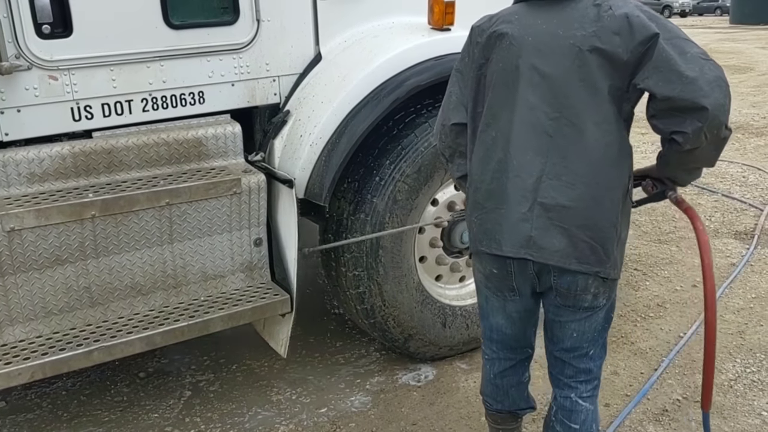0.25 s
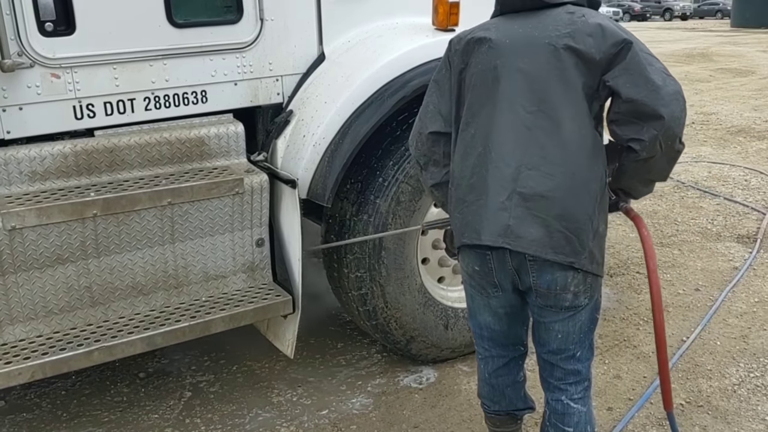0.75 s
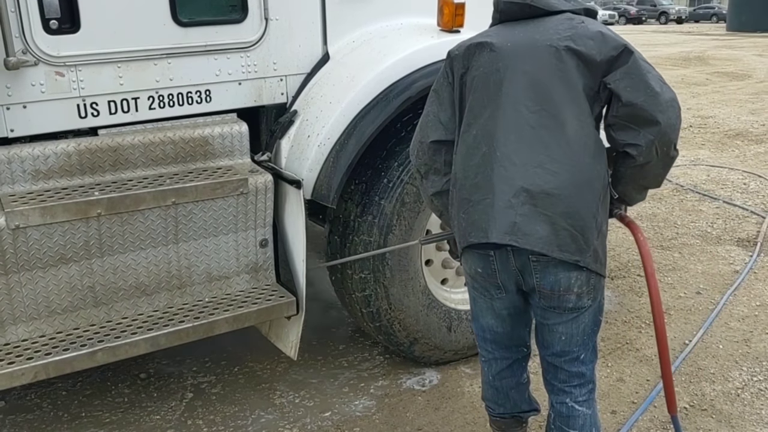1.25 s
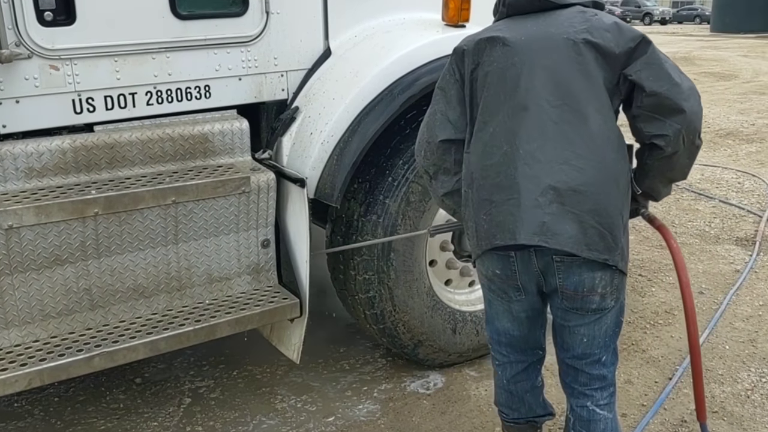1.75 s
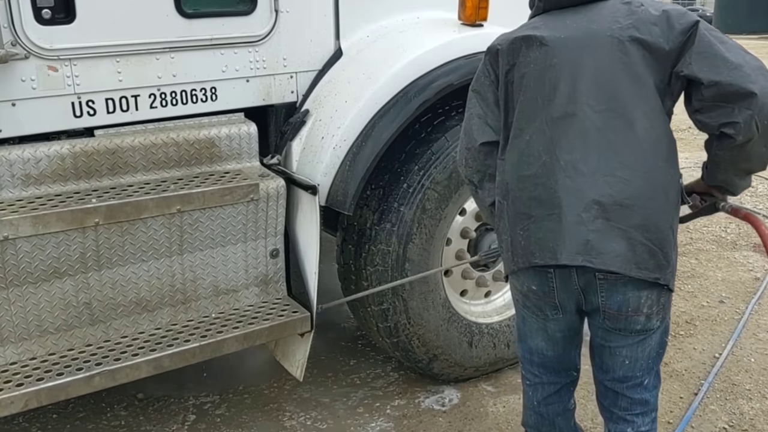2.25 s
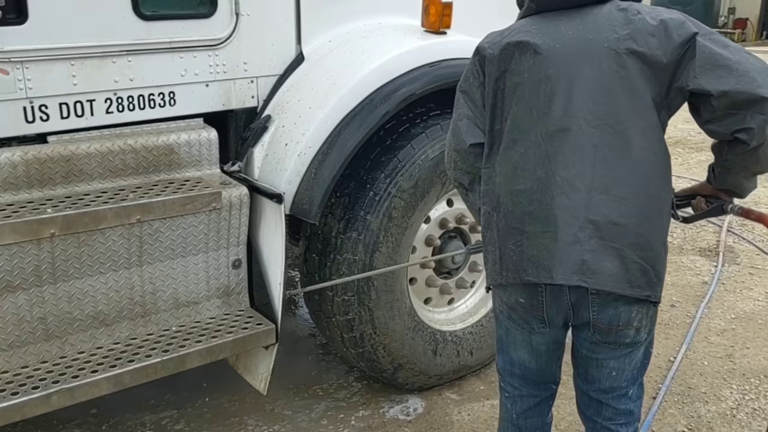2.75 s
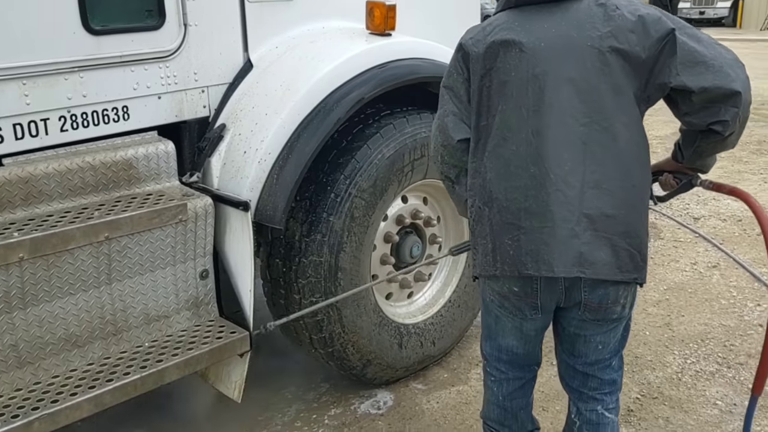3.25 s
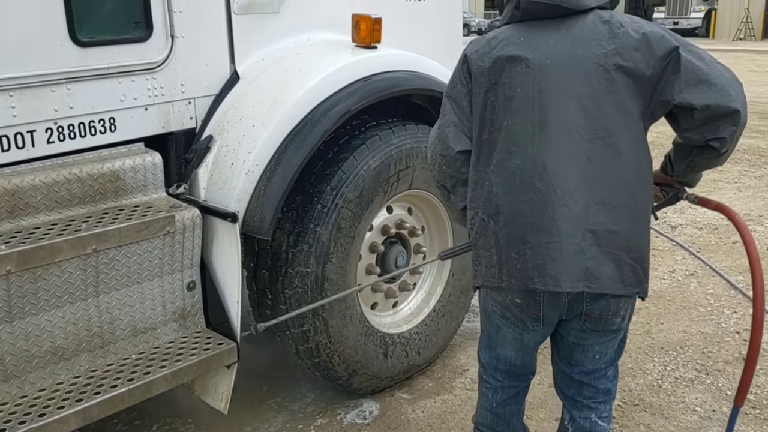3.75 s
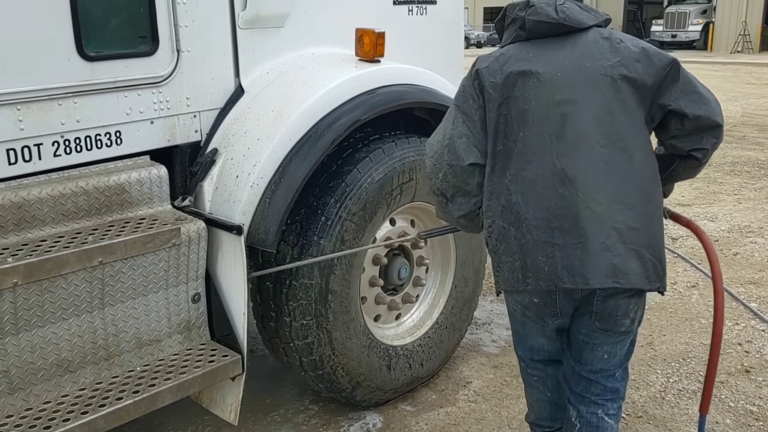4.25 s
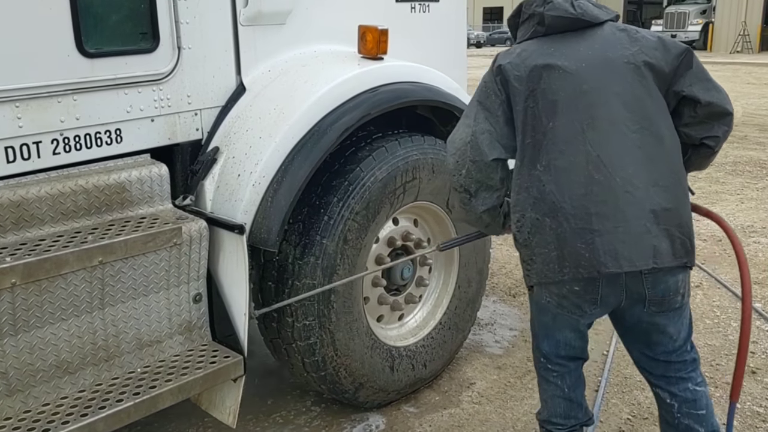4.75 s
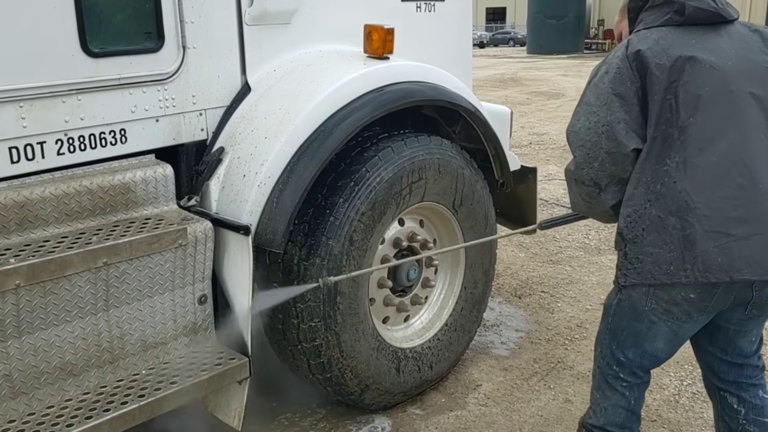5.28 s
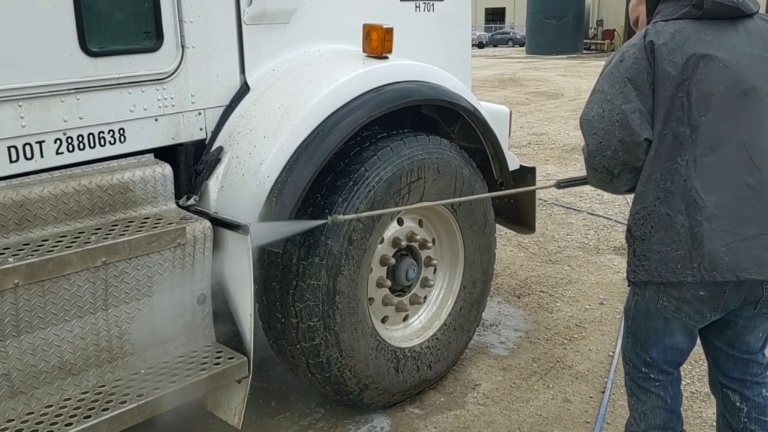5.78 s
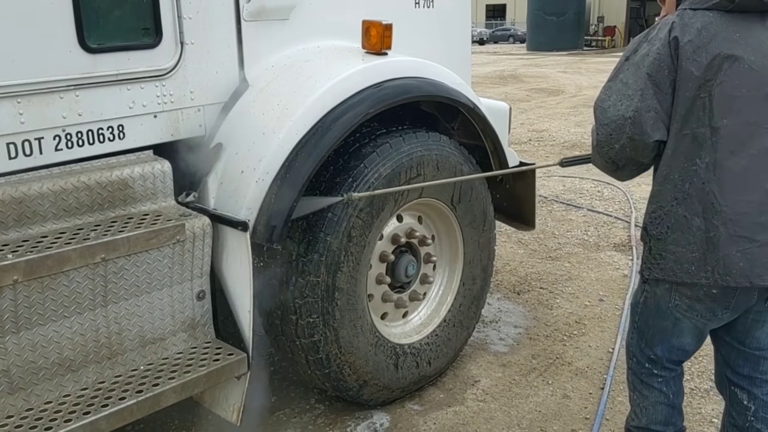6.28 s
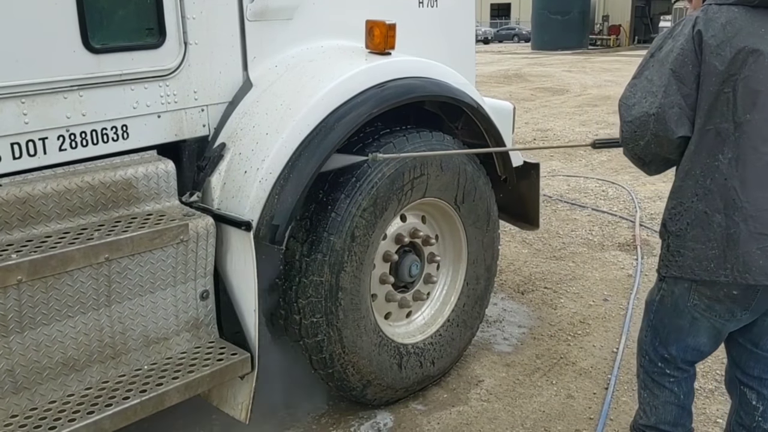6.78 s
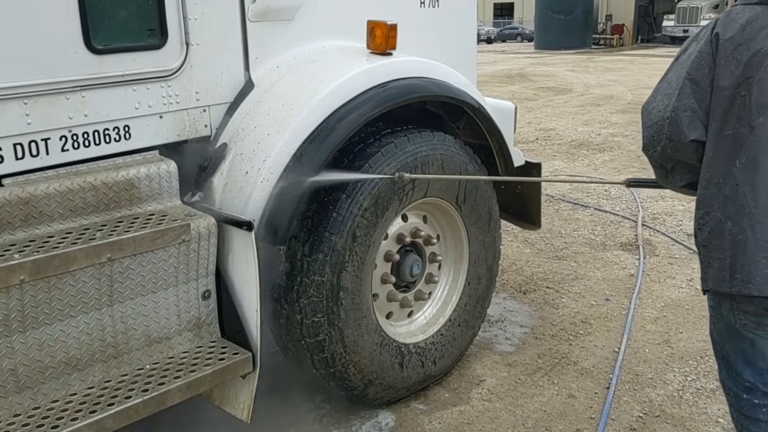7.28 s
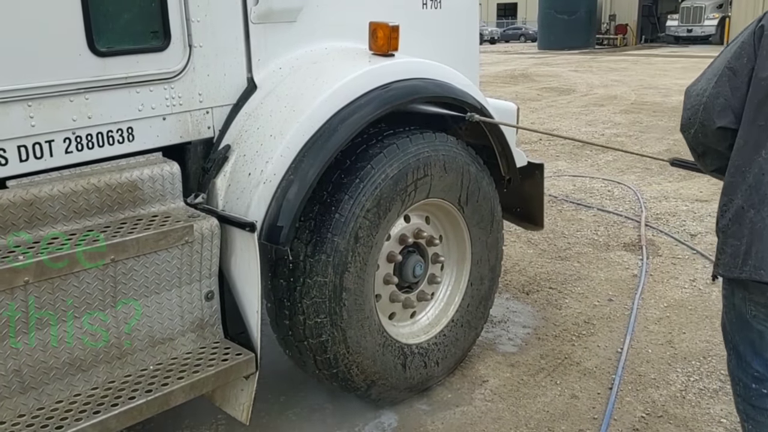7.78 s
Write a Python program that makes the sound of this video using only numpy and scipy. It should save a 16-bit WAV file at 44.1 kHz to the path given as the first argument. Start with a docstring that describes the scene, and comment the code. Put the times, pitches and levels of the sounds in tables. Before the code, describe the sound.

A bright, dense water hiss runs throughout over a distant motor's low throbbing hum. Water bursts on a rubber tyre and brushes the flap in soft hollow swells, with one brief, faint rising squeal early on. The motor recedes; the worker steps aside, the hiss becomes more exposed, and the jet climbs into the wheel arch, pelting the panel ever louder. Open gravel yard, handheld stereo microphone nearby, dry with slight reflections.

```python
"""A water jet hisses and splashes on a truck tyre, catches the mud flap, and at last drums in the wheel arch.
Spray and splash are coloured noise and dense random drops, their pitch following the aim of the wand;
the fender panel is a bank of drifting resonances pelted by drops, and a sweeping sine squeals once.
The pressure washer's engine hums some way off, a sum of orders over a throbbing rumble,
fading as the microphone moves along the truck."""
import sys
import numpy as np
from scipy import signal
from scipy.fft import rfft, irfft
from scipy.io import wavfile
from scipy.ndimage import map_coordinates

SR = 44100
rng = np.random.default_rng(int(sys.argv[2]) if len(sys.argv) > 2 else 0)


def transcribe(signal):
    """Save signal, clipped to [-1, 1], as a 16-bit WAV file at the path in sys.argv[1]."""
    frames = np.atleast_2d(signal).T
    limited = np.clip(frames, -1, 1)
    pcm = np.round(limited * 32767).astype(np.int16)
    wavfile.write(sys.argv[1], SR, pcm)


N = 353682
TIME, FREQ = np.arange(N) / SR, np.arange(N // 2 + 1) * SR / N

# pitch of spray and splash as the wand turns: (time [s], frequency ratio)
AIM_RATIO = [(0, 0.97), (2.4, 0.95), (3.1, 1.14), (4.2, 1.1), (5.25, 1), (8, 0.9)]
# the spray spreads wide: (frequency [Hz], left-right likeness [-1 to 1])
WIDE_LIKENESS = [(1200,-0.062),(1700,0.44),(2600,0.19),(3400,-0.054),(4300,0.25),(5200,0.32),(6500,0.12),(15000,-0.27)]
# jet sweeps across the mud flap: (time [s], splash level [dB], thud level [dB])
FLAP_SWEEPS = [(1.09,-52.5,-50),(1.54,-66,-57),(2.07,-51,-70),(2.377,-51,-50),(2.67,-50,-53.5),(2.99,-50,-64),(3.37,-51.5,-58),(3.78,-55,-60),(4.2,-57.5,-60),(4.8,-58,-63.5),(5.29,-52.5,-63.5),(5.51,-64,-58),(5.721,-62,-53),(5.99,-53.5,-56.5),(6.61,-63,-55),(6.69,-52.5,-62),(6.97,-53,-56),(7.35,-55,-60),(7.805,-70,-54)]
# jet drumming on the fender, before trims: (time [s], low-mode level [dB], high-mode level [dB])
DRUM_LEVELS = [(5.2, -55, -67), (5.21, -59, -62), (5.34, -50.5, -55), (5.36, -62, -53.5),
               (5.89, -52.5, -52.5), (5.91, -52, -44.5), (5.95, -52, -51.5), (6.02, -46, -53),
               (6.06, -53.5, -51.5), (6.24, -52.5, -49), (6.28, -62, -50), (6.35, -51, -46),
               (6.58, -50, -51), (6.64, -44.5, -45), (6.85, -45, -43), (7.04, -47, -49), (7.19, -54, -52),
               (7.24, -43, -45), (7.49, -43.5, -40.5), (7.79, -39.5, -36.5), (7.84, -40.5, -43),
               (7.89, -44, -41.5), (7.96, -39, -40), (8.02, -43, -36.5)]

# the worker's body screens the spray fan until he steps aside, then he lifts the jet into the wheel arch
STEP_ASIDE_S, STEP_TAKES_S, CLIMB_TAKES_S = 5.17, 0.18, 2.6
# the nozzle comes round; pan is left minus right
FACE_NOZZLE_S, FACE_TAKES_S, FACING_PAN_DB = 5.1, 1, 3
HISS_TRIM_DB, WHISTLE_TRIM_DB, SHEEN_DB = 5, 1, -45.5
SIZZLE_DB, SIZZLE_SWING = -44.5, 1.26   # mean level; how strongly it follows the fan
SIZZLE_PEAK_WIDTH_HZ, SIZZLE_PEAK_LIFT = 450, 0.37
FAN_PAN_DB = 2   # left minus right, in the open
SHARED_DIP_WIDTH_HZ, SHARED_DIP_DEPTH, SHARED_DIP_WANDER_HZ = 400, 0.71, 72
TOP_DIP_WIDTH_HZ = 1200
# the jet moves from the tread to the gap behind it
LEAVE_TREAD_S, LEAVE_TAKES_S = 1.93, 1.0
DULL_DB, DULL_LOSS_DB, DULL_OPEN_DB = -52.5, 4, 1.5   # on the tread; lost in the gap; regained in the open
BRIGHT_DB, BRIGHT_LOSS_DB, BRIGHT_DEEP_DB = -45.5, 3, 13   # on the tread; lost in the gap; lost deep in the arch
SPATTER_DB = -6.5   # bright spatter off the panel, against the high-mode level
SPLASH_SPREAD_S, THUD_SPREAD_S = 0.054, 0.03   # standard deviation of each swell
SQUEAL_S, SQUEAL_SPREAD_S, SQUEAL_DB = 1.735, 0.05, -49
SQUEAL_HZ, SQUEAL_RISE_HZ_PER_S = 2160, 2700
LOW_MODES_HZ, HIGH_MODES_HZ = 850, 1170   # modes between these share both levels
DRUM_TRIM_DB, SPOT_WAVER_DB, SPOT_DETUNE = 0.5, 1.5, 0.023
RIM_BRIGHT_DB = 9   # per octave, with the jet at the rim
CYCLE_HZ, FIRINGS = 25.6, 3   # engine cycles per second, firings per cycle
HUM_DB, NINTH_TRIM_DB = -47.9, 0.9   # the hum at its nearest; trim of the ninth order
LOW_CUT_HZ, CUTOFF_HZ = 63, 15550


def from_db(db):
    """Decibels to gain."""
    return 10 ** (np.asarray(db) / 20)


def rms_one(x):
    """Scale to unit power."""
    return x / np.sqrt(np.mean(x ** 2) + 1e-20)


def in_time(rows):
    """Each column of a curve at every sample."""
    s, *columns = np.transpose(rows)
    return [np.interp(TIME, s, c) for c in columns]


def in_frequency(points):
    """A table's value at every frequency, joined on a log axis."""
    hz, value = np.transpose(points)
    return np.interp(np.log(FREQ + 1), np.log(hz), value)


def drift(rate):
    """Random wander of unit power that heads for a new value rate times a second."""
    knots = rng.standard_normal(N // 100)
    return rms_one(map_coordinates(knots, [TIME * rate], order=1, mode="wrap"))


def ramp(start_s, takes_s):
    """A steady move from 0 to 1."""
    return np.clip((TIME - start_s) / takes_s, 0, 1)


def swell(s, spread_s):
    """A bell-shaped rise and fall."""
    return np.exp(-.5 * ((TIME - s) / spread_s) ** 2)


def pair(a, b, likeness):
    """Left and right from two unrelated signals."""
    c = np.clip(likeness, -.99, .99)
    shared = np.sqrt(1 + c) * a
    opposed = np.sqrt(1 - c) * b
    return shared + opposed * np.array([[1], [-1]])


def stereo_noise(likeness, drive=1):
    """White noise at the two ports under a driving envelope."""
    a, b = rfft(rng.standard_normal((2, N)) * drive)
    return irfft(pair(a, b, in_frequency(likeness)), N)


def colour(x, spectrum):
    """Give a noise its spectrum; unit power."""
    return rms_one(irfft(rfft(x) * from_db(in_frequency(spectrum)), N))


def turbulence(spectrum, drive=1):
    """Stereo noise under a driving envelope, then coloured; unit power."""
    # (frequency [Hz], left-right likeness [-1 to 1])
    port_likeness = [(60,0.9),(140,0.55),(300,0.73),(640,0.38),(1200,0.27),(3000,0.25)]
    return colour(stereo_noise(port_likeness, drive), spectrum)


def drops(per_s, spread_db):
    """Random impacts of uneven size."""
    size_db = spread_db * np.clip(rng.standard_normal(N), -2, 2)
    return (rng.random(N) < per_s / SR) * from_db(size_db)


def glide(x, ratio):
    """Move all frequencies of a noise by a changing ratio, as a varying playback speed."""
    place = np.cumsum(ratio) % (N - 1)
    return np.array([map_coordinates(channel, [place], order=3) for channel in x])


def resonate(x, hz, width_hz):
    """One resonance whose centre may move: shift it to 0 Hz, smooth, shift back."""
    carrier = np.exp(2j * np.pi * np.cumsum(hz) / SR)
    pole = np.exp(-np.pi * width_hz / SR)
    return (carrier * signal.lfilter([1], [1, -pole], x * carrier.conj())).real


def band(x, hz, width_hz):
    """What passes one moving resonance, at unit gain on its top."""
    scale = 4 * np.tanh(np.pi * width_hz / SR / 2)
    return scale * (resonate(x, hz, width_hz) - x / 2)


def pan(x, db):
    """Lean a stereo sound to the left by db."""
    return np.array([x[0] * from_db(db / 2), x[1] * from_db(-db / 2)])


def reflect(x, lag_s, share, sway):
    """Add an echo off the truck's side; its delay sways as the wand moves."""
    lag = lag_s * (1 + sway * drift(1.5))
    echo = np.array([np.interp(TIME - lag, TIME, channel) for channel in x])
    return (x + share * echo) / np.sqrt(1 + share ** 2)


def scatter(x, level_db, longest_s, count):
    """Faint echoes off wheel, steps and ground ripple the spectrum unevenly."""
    out = x.copy()
    for lag_s in rng.uniform(.0006, longest_s, count):
        for side in range(len(x)):
            lag = int((lag_s + rng.uniform(0, .0003)) * SR)
            out[side] += from_db(level_db) * drift(1.195) * np.roll(x[side], lag)
    return out / np.sqrt(1 + count * from_db(level_db) ** 2)


def wand():
    """How far the jet has come into the open, and how deep it is in the arch, both 0-1."""
    return ramp(STEP_ASIDE_S, STEP_TAKES_S), ramp(STEP_ASIDE_S, CLIMB_TAKES_S)


def sweeps():
    """Swell of the splash each time the jet crosses the mud flap."""
    return sum(from_db(db) * swell(s, SPLASH_SPREAD_S) for s, db, _ in FLAP_SWEEPS)


def jet():
    """The nozzle's noisy hiss and whistle and the sizzle of a dense fan of droplets, each fluttering."""
    # air noise before trims: (time [s], hiss level [dB], nozzle whistle level [dB])
    air_levels = [(0.15, -44.5, -47), (1.6, -45, -46.5), (3.45, -44, -42), (3.54, -47, -43),
                  (3.91, -45.5, -41), (4.51, -46, -41.5), (5.45, -44, -40), (7.25, -42, -43),
                  (7.78, -45.5, -44), (7.95, -45, -41.5)]
    # fan of droplets; only its swing about the mean counts: (time [s], sizzle level [dB])
    fan_levels = [(0.05, -48.5), (1.88, -46), (2.1, -44), (2.19, -48), (3.2, -44), (3.31, -48), (3.34, -44),
                  (3.45, -43.5), (3.62, -47), (3.75, -45), (5.12, -48), (5.23, -43), (5.39, -40),
                  (5.6, -42), (5.87, -41.5), (5.92, -43), (7.5, -42.5), (7.97, -46.5)]
    # strongest band of the sizzle as the wand turns: (time [s], frequency [Hz])
    sizzle_peak = [(0,4650),(1.9,4650),(2.6,4900),(3.05,5465),(5.0,5550),(5.45,4760),(6.4,5370),(8,4795)]
    # spectra of hiss, sizzle, whistle and sheen: (frequency [Hz], relative level [dB per Hz])
    hiss_spectrum = [(2100,-29),(2850,-8),(3400,-24),(3950,-31),(4700,-0.5),(6500,3.5),(7300,3.5),(8400,2.5),(9600,4),(11500,-3),(12500,3),(13300,0.5),(14200,-1.5),(15300,-2)]
    sizzle_spectrum = [(3700,-33),(4150,-11.5),(4450,-2),(5000,0.5),(5500,0),(6000,2),(6250,-2.5),(8000,-34)]
    whistle_spectrum = [(9000,-21.5),(10100,-6),(10400,-5),(10850,0.5),(11500,-2.5),(11900,-2.5),(12400,-28),(13600,-24),(14250,-2),(14600,-8),(14950,-8),(15500,-9)]
    sheen_spectrum = [(7300,-28),(8500,-1),(9500,0),(10300,-9),(11500,-32)]

    hiss_db, whistle_db = in_time(air_levels)
    ratio, = in_time(AIM_RATIO)
    fan_db, = in_time(fan_levels)
    peak_hz, = in_time(sizzle_peak)
    in_open, _ = wand()

    air = colour(glide(stereo_noise(WIDE_LIKENESS), ratio), hiss_spectrum)
    hiss = from_db(hiss_db + HISS_TRIM_DB + 0.72 * drift(22)) * air
    whistle_gain = from_db(whistle_db + WHISTLE_TRIM_DB + 0.82 * drift(20))
    whistle = whistle_gain * turbulence(whistle_spectrum)

    droplets = stereo_noise(WIDE_LIKENESS, drops(per_s=33000, spread_db=3.5))
    fan = glide(colour(droplets, sizzle_spectrum), ratio)
    fan = fan + SIZZLE_PEAK_LIFT * band(fan, peak_hz, SIZZLE_PEAK_WIDTH_HZ)
    sizzle_db = SIZZLE_DB + SIZZLE_SWING * (fan_db - fan_db.mean())
    sizzle = from_db(sizzle_db + 0.84 * drift(32)) * fan

    # a narrower band of hiss comes in as the nozzle turns
    facing = ramp(FACE_NOZZLE_S, FACE_TAKES_S)
    sheen = from_db(SHEEN_DB) * facing * turbulence(sheen_spectrum)
    nozzle = pan(hiss + whistle + sheen, FACING_PAN_DB * facing)
    return scatter(nozzle + pan(sizzle, FAN_PAN_DB * in_open), level_db=-14, longest_s=.0055, count=6)


def tyre_splash():
    """Dense drops burst on wet rubber, arriving in uneven slugs and spattering with each sweep."""
    # (frequency [Hz], relative level [dB per Hz])
    dull_spectrum = [(220,-10),(450,-8),(600,-2),(700,-2.5),(755,-0.5),(810,-1.5),(900,-4.5),(1150,-6.5),(1600,-16.5)]
    bright_spectrum = [(850,-21),(1200,-6),(1390,-1),(2050,-0.5),(2450,-5),(3300,-3.5),(3900,0),(4700,0),(7000,-74)]

    in_gap = ramp(LEAVE_TREAD_S, LEAVE_TAKES_S)
    in_open, depth = wand()
    ratio, = in_time(AIM_RATIO)
    _, drum_db = in_time(DRUM_LEVELS)
    slugs = from_db(.75 * drift(40))

    dull_gain = from_db(DULL_DB - DULL_LOSS_DB * in_gap + DULL_OPEN_DB * in_open)
    dull_drops = turbulence(dull_spectrum, slugs * drops(per_s=9700, spread_db=3.0))
    dull = dull_gain * glide(dull_drops, ratio)

    spatter = sweeps() + in_open * from_db(SPATTER_DB + drum_db)
    tread_gain = from_db(BRIGHT_DB - BRIGHT_LOSS_DB * in_gap - BRIGHT_DEEP_DB * depth)
    bright_gain = np.hypot(tread_gain, spatter)   # powers add
    spray = glide(stereo_noise(WIDE_LIKENESS, slugs * drops(per_s=14000, spread_db=1)), ratio)
    bright = bright_gain * from_db(1.0 * drift(28)) * colour(spray, bright_spectrum)
    return reflect(dull + bright, lag_s=.0071, share=0.25, sway=0.031)


def shifting_dips(x):
    """Two shifting dips colour the spray: one in what both sides share, one in the top treble."""
    # dip near 4 kHz in what both sides share, slowly shifting: (time [s], frequency [Hz])
    shared_dip = [(0,3890),(2.2,3900),(3.2,4040),(4.4,3960),(5.3,3960),(6.1,3820),(8,3640)]
    # dip in the top treble: (time [s], frequency [Hz], depth [0-1])
    treble_dip = [(0,13100,0.2),(2.0,13500,.48),(2.25,13300,0),(3.4,12900,.2),(5.4,12800,0.1),(5.62,12700,0.7),(5.95,12700,0.1)]
    hz, = in_time(shared_dip)
    top_hz, top_depth = in_time(treble_dip)
    wandering_hz = hz + SHARED_DIP_WANDER_HZ * drift(14)
    x = x - SHARED_DIP_DEPTH * band(x.mean(axis=0), wandering_hz, SHARED_DIP_WIDTH_HZ)
    return x - top_depth * band(x, top_hz, TOP_DIP_WIDTH_HZ)


def fender():
    """Slugs of water pelt the panel; its modes swell and shift as the spot wanders."""
    # modes of the panel and the air behind it: (frequency [Hz], width [Hz], relative level [dB])
    panel_modes = [(308,25,-7),(532,65,-5.5),(653,120,-3),(844,95,-2.5),(904,37,-7),(1027,72,-7.5),(1156,116,-6),(1293,80,-3.5),(1447,136,-5),(1522,97,-4),(1880,93,-13),(2064,91,-11)]
    in_open, depth = wand()
    low_db, high_db = in_time(DRUM_LEVELS)
    pelting = rng.standard_normal((2, N)) * drops(per_s=16000, spread_db=0.5) * from_db(0.71 * drift(60))
    force = pair(*pelting, likeness=0.84)
    panel = 0
    for hz, width_hz, mode_db in panel_modes:
        high = np.interp(hz, [LOW_MODES_HZ, HIGH_MODES_HZ], [0, 1])
        drum_db = (1 - high) * low_db + high * high_db
        tilt_db = RIM_BRIGHT_DB * (1 - depth) * high * np.log2(hz / HIGH_MODES_HZ)
        level_db = DRUM_TRIM_DB + mode_db + drum_db + tilt_db + SPOT_WAVER_DB * drift(9)
        ring = rms_one(resonate(force, hz * (1 + SPOT_DETUNE * drift(6)), width_hz))
        panel = from_db(level_db) * in_open * ring - panel   # neighbours swing opposite ways
    panel = signal.sosfilt(signal.butter(5, 430, "high", fs=SR, output="sos"), panel)
    panel = signal.sosfilt(signal.butter(10, 2230, fs=SR, output="sos"), panel)
    return pan(reflect(panel, lag_s=.0113, share=0.18, sway=0.03), 3.5)


def mud_flap():
    """A hollow splash and a short dull roar each time the jet sweeps across the flap."""
    # (frequency [Hz], relative level [dB per Hz])
    thud_spectrum = [(90,-26),(200,-0.5),(300,4.5),(450,-7.5),(800,-0.5),(1200,-23)]
    splash_spectrum = [(400,-22),(680,-6),(820,2),(980,0.5),(1250,-6.5),(2000,-15),(3000,-29)]
    thuds = sum(from_db(db) * swell(s, THUD_SPREAD_S) for s, _, db in FLAP_SWEEPS)
    return thuds * turbulence(thud_spectrum) + sweeps() * turbulence(splash_spectrum)


def squeal():
    """A brief, breathy, rising whistle, as of the jet catching an edge: a sine with jittered pitch."""
    hz = SQUEAL_HZ + SQUEAL_RISE_HZ_PER_S * (TIME - SQUEAL_S) + 45 * drift(300)
    return from_db(SQUEAL_DB) * swell(SQUEAL_S, SQUEAL_SPREAD_S) * np.sin(2 * np.pi * np.cumsum(hz) / SR)


def engine():
    """Orders of the engine cycle, over a rumble that throbs with each firing."""
    # engine at the microphone, before trims: (time [s], hum level [dB], ninth-order level [dB])
    engine_levels = [(0.05, -45.5, -63.5), (0.84, -45.5, -70), (1.19, -45.5, -81), (2.32, -46, -56),
                     (3.33, -54.8, -62), (4.8, -53.5, -59.5), (5.95, -61, -65.5), (7.66, -61.5, -66),
                     (7.95, -57.5, -63)]
    # (multiple of the cycle rate, level re HUM_DB [dB], share of the hum's fading that it follows)
    engine_orders = [(3,-43,.49),(4,-14,.43),(5,-16,1),(6,-0.5,0.94),(7,-19.5,.32),(8,-23,1),(10,-21.5,1),(12,-17.5,0.98),(13,-22,0.44),(15,-19.5,.6),(16,-20.5,0.41),(17,-26,1),(18,-18.5,.83),(19,-21,0.6),(21,-22,.6),(24,-19.5,0.6),(27,-20,0.54),(29,-16.5,.9),(30,-19.5,0.092),(31,-19.5,0.22),(35,-23,.7)]
    # rumble and clatter: (frequency [Hz], relative level [dB per Hz])
    rumble_spectrum = [(20,-29),(40,-17),(75,-5.5),(115,-9.5),(190,-9.5),(400,-11.5),(800,-6),(2000,-20)]

    hum_db, ninth_db = in_time(engine_levels)
    fade_db = hum_db - hum_db.max()
    turn = 2 * np.pi * np.cumsum(CYCLE_HZ * (1 + 0.00118 * drift(3.08))) / SR
    # the ninth order swells by itself as the microphone crosses its standing wave
    lines = from_db(ninth_db + NINTH_TRIM_DB) * np.sin(9 * turn)
    for order, level_db, follows in engine_orders:
        gain = from_db(HUM_DB + level_db + follows * fade_db + 0.89 * drift(6))
        lines = lines + gain * np.sin(order * turn + rng.uniform(0, 2 * np.pi))
    firing = 1 + 0.3 * np.cos(FIRINGS * turn)
    rumble = turbulence(rumble_spectrum, firing) * from_db(HUM_DB - 2.0 + 0.59 * fade_db)
    return np.sqrt(2) * lines + rumble   # sine levels are rms


def scene():
    """All sources together in the open air."""
    spray = shifting_dips(jet() + tyre_splash())
    return spray + fender() + mud_flap() + squeal() + engine()


def record(dry):
    """Each port colours its side; deep bass is rolled off and the top is cut steeply."""
    # colour of the two microphone ports: (frequency [Hz], left minus right [dB])
    port_tilt = [(150,0.5),(400,0),(770,-2),(2000,2),(2800,-1),(3450,-8),(4050,2),(4700,2.5),(5700,4.5),(7000,-4),(9400,-9.5),(10400,-13.5),(12000,-13),(13200,-10),(14600,-11.5)]
    ports = from_db(in_frequency(port_tilt) * np.array([[.5], [-.5]]))
    dry = signal.sosfilt(signal.butter(3, LOW_CUT_HZ, "high", fs=SR, output="sos"), dry)
    low_pass = 1 / np.sqrt(1 + (FREQ / CUTOFF_HZ) ** 300)
    return irfft(rfft(dry) * ports * low_pass, N)


dry = scene()
out = record(dry)
transcribe(out)
```